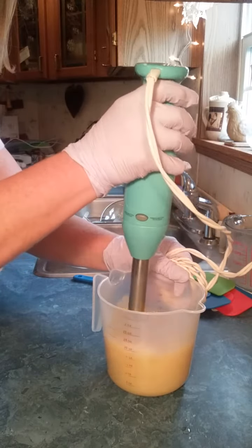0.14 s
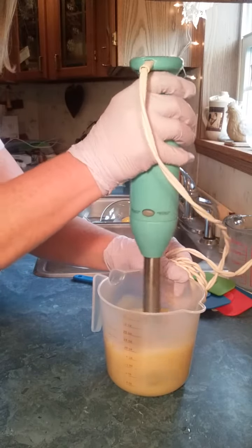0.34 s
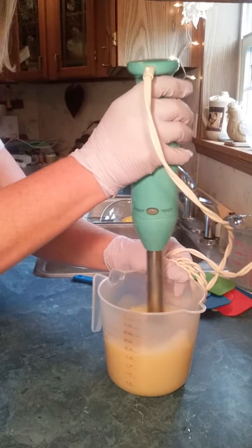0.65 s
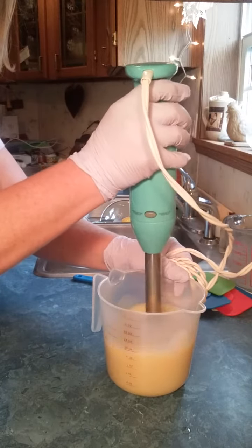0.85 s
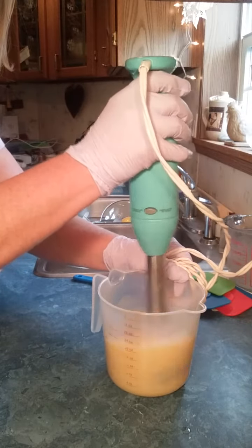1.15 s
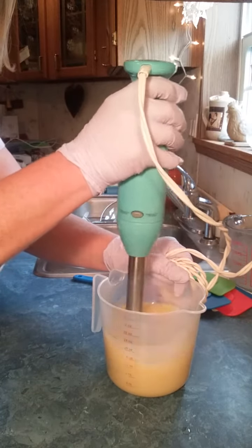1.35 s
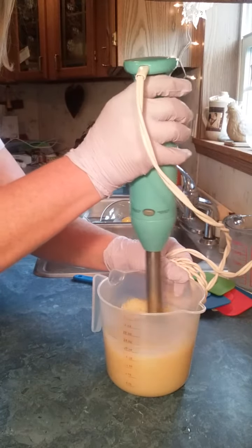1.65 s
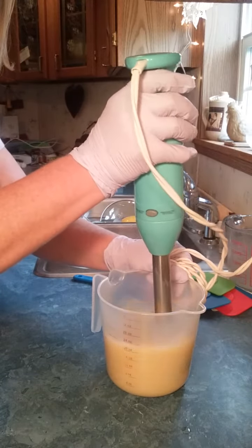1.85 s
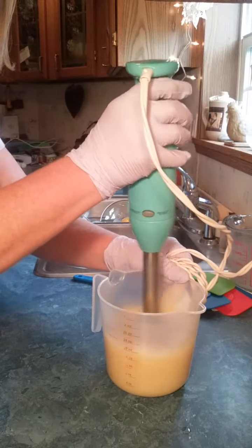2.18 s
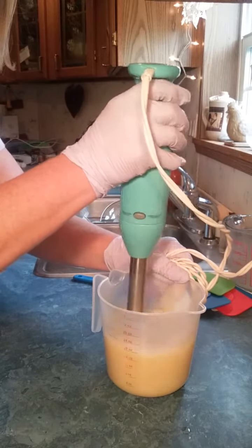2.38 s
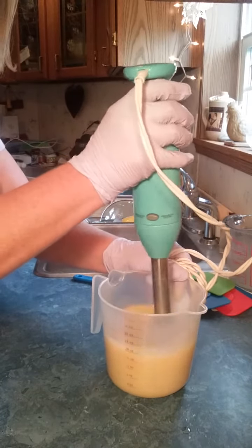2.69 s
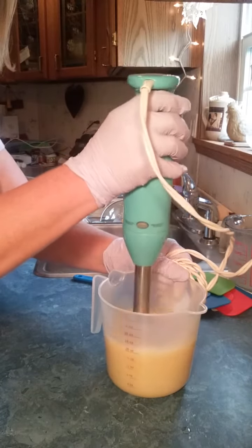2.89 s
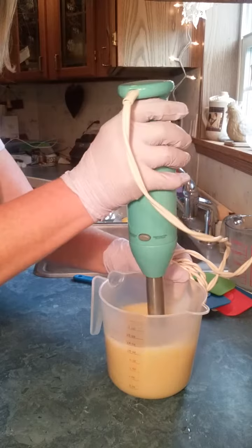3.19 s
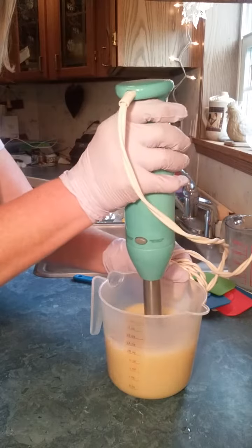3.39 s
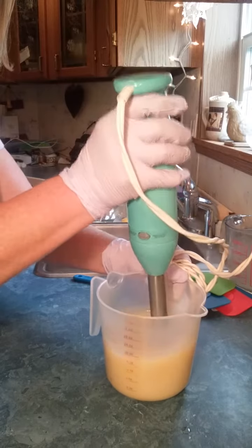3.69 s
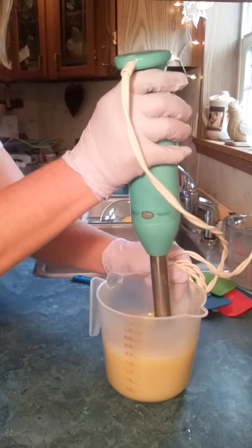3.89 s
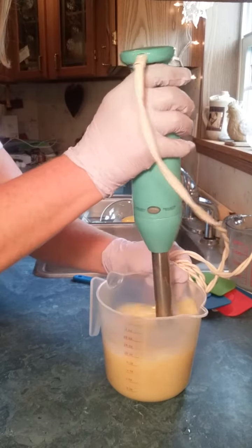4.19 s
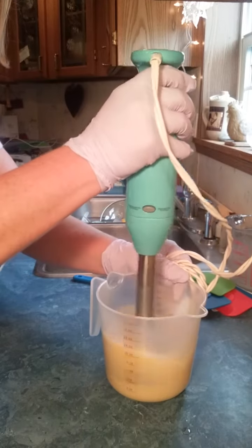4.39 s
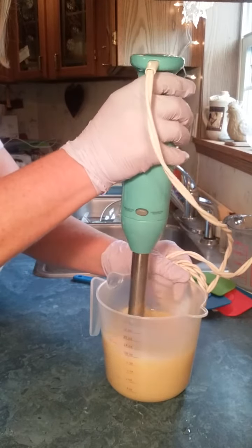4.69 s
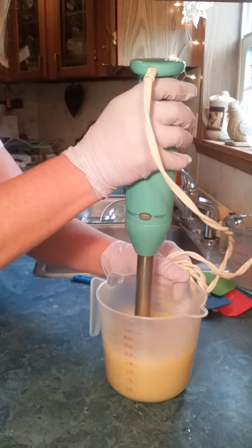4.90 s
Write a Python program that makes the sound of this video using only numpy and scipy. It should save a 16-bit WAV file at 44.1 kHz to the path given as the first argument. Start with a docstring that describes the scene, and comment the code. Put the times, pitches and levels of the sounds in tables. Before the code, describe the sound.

A stick blender, already running, is pulsed in thick batter in a plastic jug. Ten short presses follow: each motor run rises fast with hum, rattle and wet churning, then coasts down in pitch. Air pockets plop between them, the metal bell clacks on the jug, and a heavy dull bump lands just after 3.2 seconds. Close phone microphone, small kitchen, short echo.

```python
"""A kitchen counter, heard close by on a phone microphone, with a short echo from counter and cupboards.
A stick blender in a plastic jug of thick batter is already running; ten presses follow one another to the end.
In each the motor spins up, the shaft hums, coupling and bearing rattle, brushes hiss and the blade churns; then
it coasts. Around the presses air pockets plop, the bell clacks on the jug wall, and bumps ring jug and counter,
hardest just after 3.2 s. Noise shaped into resonances, ticks tied to the shaft and decaying sines make it all."""
import sys
import numpy as np
from scipy import signal
from scipy.fft import rfft, irfft
from scipy.io import wavfile
from scipy.ndimage import uniform_filter1d

SR = 44100
rng = np.random.default_rng(int(sys.argv[2]) if len(sys.argv) > 2 else 0)


def generate_wav(signal):
    """Clip the signal to [-1, 1] and save it as 16-bit WAV at the path in sys.argv[1]."""
    frames = np.transpose(np.atleast_2d(signal))
    scaled = np.clip(frames, -1, 1) * 32767
    pcm = np.round(scaled).astype(np.int16)
    wavfile.write(sys.argv[1], SR, pcm)


N = 222294
TIME = np.arange(N) / SR


def undb(db):
    """Decibels to gain."""
    return 10 ** (np.asarray(db) / 20)


def unit(x):
    """Scale to rms 1."""
    return x / np.sqrt(np.mean(x ** 2))


def shape_db(points, hz):
    """Read a spectrum on a log-frequency axis."""
    f, db = np.transpose(points)
    return np.interp(np.log(np.maximum(hz, 1)), np.log(f), db)


def colour(x, points, size=4096):
    """Causal filter with the given spectrum: minimum phase, by folding the cepstrum."""
    cepstrum = irfft(np.log(undb(shape_db(points, np.fft.rfftfreq(size, 1 / SR)))))
    cepstrum[1:size // 2] *= 2
    cepstrum[size // 2 + 1:] = 0
    response = irfft(np.exp(rfft(cepstrum)))
    return signal.fftconvolve(x, response)[:len(x)]


def walk(rate):
    """Smooth random wander, rms 1, with a new target `rate` times a second."""
    k = int(SR / rate)
    steps = np.repeat(rng.standard_normal(N // k + 1), k)
    return unit(uniform_filter1d(steps, k)[:N])


def fade(t, t60):
    """Exponential decay, 60 dB down after t60."""
    return np.exp(-np.log(1000) * t / t60)


def add(out, s, sound, db):
    """Mix a sound in at time s with the given peak level."""
    i = int(s * SR)
    out[i:i + len(sound)] += (undb(db) * sound / np.abs(sound).max())[:N - i]


# colour of the quiet kitchen: f/Hz, relative level/dB
KITCHEN_COLOUR = [(25, -12), (45, 0), (80, 0), (150, 4), (300, -7), (500, -10), (1000, -6), (2000, -14),
                  (5000, -19), (15000, -20)]


def kitchen(level_db=-69):
    """The quiet kitchen around the counter: steady coloured noise at a set rms level."""
    return undb(level_db) * unit(colour(rng.standard_normal(N), KITCHEN_COLOUR))


def room(x, wet_db=-9, t60=0.15, first_s=0.0031):
    """Counter and cupboards return a short, dense echo: a decaying noise tail behind the direct sound."""
    t = TIME[:SR // 2]
    tail = rng.standard_normal(len(t)) * fade(t, t60) * (t > first_s)
    return x + undb(wet_db) * signal.fftconvolve(x, tail / np.linalg.norm(tail))[:N]


# the bell bumps the jug against the counter: t/s, peak level/dB, pitch as a share of the modes' f
JUG_BUMPS = [(0.292, -32, 0.84), (.718, -45, 1.05), (1.249, -32.5, 0.94), (1.306, -28, 0.93),
             (1.82, -39, 0.98), (2.775, -36.5, 0.96), (2.838, -38.5, 1.04), (3.09, -23.5, 1.21),
             (3.216, -11.5, 1.05), (3.66, -18, 1.06), (3.765, -28.5, 0.968), (3.822, -37, 1.25),
             (4.383, -35.5, 1.08), (4.41, -40, 0.99), (4.851, -33, 1.01), (4.939, -47, 1)]
# what jug and counter ring with: f/Hz, relative level/dB, t60/s
JUG_RINGING = [(61, -16, 0.15), (118.5, -12.5, 0.21), (144.9, 6.5, 0.11), (175, -13.5, 0.1),
               (228, -6.5, 0.066)]


def bumps(contact_s=0.003):
    """Soft, cushioned blows set the modes of jug and counter ringing."""
    out, t = np.zeros(N), TIME[:SR // 3]
    cushion = 1 - np.exp(-(t / contact_s) ** 2)
    for s, peak_db, pitch in JUG_BUMPS:
        ring = sum(undb(db) * fade(t, t60) * np.sin(2 * np.pi * pitch * hz * t) for hz, db, t60 in JUG_RINGING)
        add(out, s, ring * cushion, peak_db)
    return out


# air pockets pop in the batter: t/s, peak level before the room/dB, starting f/Hz, smack level against ring/dB
AIR_POCKETS = [(.229, -30, 820, -18), (.254, -31.5, 2670, -5), (.285, -34, 1910, -1),
               (.357, -42, 1020, -19), (1.034, -24.5, 2548, -2), (1.118, -25, 1450, -9.5),
               (1.169, -45, 1440, -4), (1.202, -33.5, 897, -5), (1.22, -38, 1300, -22),
               (1.228, -30, 2200, -11), (1.248, -33.5, 1264, -4), (1.299, -35.5, 890, 4),
               (1.358, -40, 735, -9), (1.689, -25.5, 1049, -4), (2.198, -27, 875, -1),
               (2.298, -39, 906.4, 0), (2.772, -39.5, 1070, 0), (2.835, -41.5, 710, -2),
               (2.894, -32, 990, 1), (4.395, -34, 913, -3), (4.467, -42, 1180, 9), (4.77, -24, 2640, -16)]


def plops(ring_t60=0.058, smack_t60=0.12, glide=2.9, onset_s=0.00044):
    """Each air pocket rings, rising in pitch by `glide` of its start per second, inside a short wet smack."""
    out, t = np.zeros(N), TIME[:SR // 6]
    smack_colour = [(300, -18.5), (750, 0.5), (1200, -1.0), (2200, -9.0),
                    (3200, -13.5), (5500, -20.5), (7000, -29.5), (14000, -30)]  # f/Hz, level/dB
    for s, peak_db, hz, smack_db in AIR_POCKETS:
        ring = fade(t, ring_t60) * np.sin(2 * np.pi * hz * (t + glide * t ** 2 / 2))
        smack = unit(colour(rng.standard_normal(len(t)), smack_colour)) * fade(t, smack_t60)
        onset = 1 - np.exp(-t / onset_s)
        add(out, s, (ring + undb(smack_db) * smack) * onset, peak_db)
    return out


# the steel bell clacks on the jug wall: t/s, peak level before the room/dB
WALL_CLACKS = [(1.411, -29.5), (2.911, -31), (3.393, -31.5), (4.022, -33.5), (4.376, -30.5), (4.538, -22.5)]


def clacks(t60=0.12, housing_db=-3):
    """A short knock, a decaying burst of noise, rings both the bell and the housing."""
    out, t = np.zeros(N), TIME[:SR // 6]
    for s, peak_db in WALL_CLACKS:
        blow = rng.standard_normal((2, len(t))) * fade(t, t60)
        bell = colour(blow[0], BELL_COLOUR)
        housing = colour(blow[1], DRIVE_COLOUR)
        add(out, s, bell + undb(housing_db) * housing, peak_db)
    return out


def spin(on, off, coast_s, rise_s=.04, friction=.12):
    """Share of full speed: the rotor gains energy under power, then batter and bearings brake it to a stop."""
    powered = np.sqrt(1 - np.exp(-np.clip(TIME - on, 0, 1) / rise_s))
    coasting = (1 + friction) * np.exp(-np.clip(TIME - off, 0, 1) / coast_s) - friction
    return powered * np.maximum(coasting, 0)


def attack(on, attack_s=0.013):
    """Soft start: the coupling takes up its play and the blade catches the batter."""
    return 1 - np.exp(-np.maximum(TIME - on, 0) / attack_s)


# presses of the button, shared by every layer of the motor: on t/s, off t/s, full-speed shaft f/Hz,
#   coasting time constant/s, levels of drive rattle, bell chatter and churning/dB (scene() trims them),
#   vortex f at switch-on/Hz, at switch-off/Hz, deepest bite t/s, swell of the churning there/dB,
#   levels of shaft orders 1, 2, 3, 4, 5 at full speed/dB
BUTTON_PRESSES = [ (-.15, .091, 172.5, 0.28, -31, -30, -31.5, 1000, 1070, .02, 5, -36, -43, -44, -34, -50),
                  (0.353, 0.569, 175.9, .2, -30, -29.5, -30, 960, 1050, .46, 2.5, -33, -45.5, -42.5, -32.5, -49),
                  (0.807, 0.963, 177.1, 0.25, -31.5, -29, -35, 990, 845, .93, 4, -29.5, -46, -47, -28, -33),
                  (1.402, 1.616, 176.2, 0.24, -30.5, -30, -32.5, 960, 938.2, 1.48, 9, -35, -45.5, -42, -28, -38.5),
                  (1.915, 2.099, 175.8, 0.22, -30, -31, -37.5, 1000, 1060, 2.01, 8.5, -30, -47, -50, -34, -64),
                  (2.334, 2.556, 173, 0.22, -29.5, -30.5, -31.5, 1020, 1091, 2.47, 0.5, -37, -45, -52.5, -38.5, -41),
                  (2.902, 3.119, 173.2, .225, -28.5, -26.5, -31, 900, 1440, 3.065, 8.5, -32.5, -39, -45, -46, -48.5),
                  (3.384, 3.64, 173.1, .245, -30, -26.5, -32.5, 1070, 1111, 3.63, 0.5, -31.5, -36.5, -44.5, -46, -50),
                  (4.012, 4.155, 175.8, .22, -31, -30.5, -38.5, 880, 1138, 4.125, 4, -36, -52, -53, -34.5, -48),
                  (4.523, 4.751, 172.5, 0.22, -29.5, -31, -34, 1240, 1090, 4.7, 3.5, -36.5, -51.5, -51, -38, -39.5)]


def shaft_speed():
    """Turns per second of the shaft; the fastest press wins, and 1 Hz keeps the turn count rising."""
    runs = [hz * spin(on, off, coast_s) for on, off, hz, coast_s, *_ in BUTTON_PRESSES]
    return np.max(runs, axis=0) + 1


# loudness follows a power of the shaft speed: exponent under power, exponent while coasting
RATTLE_POWERS = (1.73, 3.0)
CHATTER_POWERS = (0.99, 3.3)
CHURN_POWERS = (.5, 2.54)


def loudness(on, off, coast_s, powers, still_share=.11, lag_s=0.007):
    """Envelope of one press: swells with the speed, outlasts the current by lag_s, is nil below still_share."""
    share = np.maximum((spin(on, off + lag_s, coast_s) - still_share) / (1 - still_share), 0)
    return attack(on) * share ** np.where(TIME < off, powers[0], powers[1])


def load(bite_s=0.043):
    """Gains of rattle, chatter and churning; the churning swells over about bite_s each side of the bite."""
    rattling, chattering, churning = np.zeros((3, N))
    for on, off, _, coast_s, rattle_db, chatter_db, churn_db, _, _, bite_at, bite_db, *_ in BUTTON_PRESSES:
        bite = np.exp(-((TIME - bite_at) / bite_s) ** 2 / 2)
        rattling += undb(rattle_db) * loudness(on, off, coast_s, RATTLE_POWERS)
        chattering += undb(chatter_db) * loudness(on, off, coast_s, CHATTER_POWERS)
        churning += undb(churn_db + bite_db * bite) * loudness(on, off, coast_s, CHURN_POWERS)
    return rattling, chattering, churning


def swirl(speed, db=-42, waver_db=3.3, power=1.69):
    """The swirling batter buffets the jug with a low, lumpy rumble that grows with the speed."""
    shaking = colour(rng.standard_normal(N), COUNTER_COLOUR)
    rumble = signal.sosfilt(signal.butter(4, 280, fs=SR, output="sos"), shaking)
    return undb(db + waver_db * walk(25)) * unit(rumble) * (speed / speed.max()) ** power


# whine of the commutator: shaft order, level at top speed/dB (wavering)
COMMUTATOR_WHINE = [(24, -45), (48, -55), (70, -60), (84, -63)]


def brushes(turns, speed, hiss_db=-53.0, hiss_power=1.45, whine_power=6):
    """Carbon brushes hiss on the commutator and its segments whine, both following the shaft speed."""
    hiss_colour = [(2500, -18), (6000, -4.0), (8300, -3), (8900, -4.5),
                   (10200, -2.5), (11700, -6.5), (12400, -5), (15500, -11.5)]  # f/Hz, level/dB
    hiss = unit(colour(rng.standard_normal(N), hiss_colour))
    sway = .002 * walk(120)  # turns
    whine = sum(undb(db + 2 * walk(30)) * np.sin(2 * np.pi * k * (turns + sway)) for k, db in COMMUTATOR_WHINE)
    share = speed / speed.max()
    return undb(hiss_db) * hiss * share ** hiss_power + whine * share ** whine_power


def rattle(turns, pattern_db, scatter_db, slip, hiss_db, count=24):
    """Ticks at fixed angles of the shaft, partly alike on every turn, with rubbing noise that swells once a turn."""
    angles, pattern = rng.random(count), rng.standard_normal(count)
    chance = rng.standard_normal((int(turns[-1]), count, 2))
    at = np.arange(len(chance))[:, None] + angles + slip * chance[..., 0]
    size_db = pattern_db * np.cos(2 * np.pi * angles) + scatter_db * np.minimum(chance[..., 1], 2)
    sizes = np.sign(pattern) * undb(size_db)
    ticks = np.bincount(np.searchsorted(turns, at.ravel()), sizes.ravel(), N + 1)[:N]
    # slow turns tick less often, so each tick carries more of the sound
    ticks = unit(ticks / np.sqrt(np.gradient(turns) * SR + 10))
    rub = unit(rng.standard_normal(N) * undb(pattern_db * np.cos(2 * np.pi * turns)))
    return ticks + undb(hiss_db) * rub


def vortex_pitch():
    """The hollow around the blade changes pitch steadily during a press, then drifts on to the next one."""
    presses = np.array(BUTTON_PRESSES)
    return np.interp(TIME, presses[:, :2].ravel(), presses[:, 7:9].ravel())


# resonances of the batter's hollow and the jug above it: f/Hz, width/Hz
VORTEX_MODES = [(680, 325), (860, 570), (1040, 256), (1250, 92), (1520, 480)]
# colour of the churned batter: f/Hz, relative level/dB
BATTER_COLOUR = [(300, -39), (400, -22.5), (460, 3.5), (570, -10), (640, -2), (780, -0.5), (860, -1.5),
                 (920, -1.5), (1040, 4.5), (1150, -1), (1250, 2.5), (1420, -4), (1600, -0.5), (2100, -49)]


def churn(turns, flutter_db=1.5, spread_octaves=0.38, wander=0.1):
    """The blade tears the batter; the vortex stresses whichever resonances lie near its own shifting pitch."""
    vortex_hz = vortex_pitch() * np.exp(wander * walk(50))
    octaves_off = [np.log2(hz / vortex_hz) for hz, _ in VORTEX_MODES]
    weights = np.exp(-(np.array(octaves_off) / spread_octaves) ** 2 / 2)
    weights /= np.linalg.norm(weights, axis=0)
    out = np.zeros(N)
    for weight, (hz, width) in zip(weights, VORTEX_MODES):
        tearing = rattle(turns, pattern_db=-0.5, scatter_db=7.0, slip=.06, hiss_db=-11.5)
        out += weight * signal.lfilter(*signal.iirpeak(hz, hz / width, fs=SR), tearing)
    return unit(colour(out, BATTER_COLOUR)) * undb(flutter_db * walk(80))


# colour of the steel bell around the blade: f/Hz, relative level/dB
BELL_COLOUR = [(900, -16), (1400, -8.5), (1560, -3.5), (1780, 0.5), (1900, 1.5), (2020, 3), (2130, 2.5),
               (2250, 3.5), (2400, -6.5), (2900, -13.5), (4500, -46)]


def chatter(turns, flutter_db=2.0):
    """The shaft knocks in its lower bearing and rings the steel bell."""
    knocks = rattle(turns, pattern_db=2.5, scatter_db=1.5, slip=0.027, hiss_db=-10.5)
    return unit(colour(knocks * undb(flutter_db * walk(130)), BELL_COLOUR))


# colour of the drive in its housing: f/Hz, relative level/dB
DRIVE_COLOUR = [(1200, -16.5), (2400, -5), (2700, -4), (2900, -4), (3300, -3), (4300, -0.5), (4850, -4.5),
                (5300, -4.5), (6300, -12.5), (7500, -21), (8900, -26.5), (12800, -37), (16000, -31)]


def drive(turns, flutter_db=1.0):
    """The shaft coupling rasps in the housing with every turn."""
    ticks = rattle(turns, pattern_db=2.5, scatter_db=5.0, slip=.04, hiss_db=2.0)
    return unit(colour(ticks, DRIVE_COLOUR)) * undb(flutter_db * walk(90))


# how jug and counter pass on the shaft's shaking: f/Hz, relative level/dB
COUNTER_COLOUR = [(40, -46), (70, -8), (105, -4), (145, 8.5), (175, 3.5), (200, -3.5), (238, 5),
                  (290, -4.5), (345, -6.5), (410, -14.5), (520, -11.5), (570, -8), (700, -2.5), (900, -6)]


def hum(waver_db=2.0, coast_waver_db=4, jitter=0.011, shake_power=2.53, buzz_power=5.16, buzz_t60=0.36,
        surge_db=22, jerk_turns=0.0043):
    """Unbalance (orders 1, 2) sweeps the counter's resonances; motor buzz (3-5) dies away after switch-off."""
    out = np.zeros(N)
    wobble = 1 + jitter * walk(90)
    # clinging lumps jerk the shaft back and forth within a turn
    jerk = jerk_turns * walk(200)
    wavers = [walk(55) for _ in range(5)]
    for on, off, full_hz, coast_s, *columns in BUTTON_PRESSES:
        order_levels = columns[-5:]
        share = spin(on, off, coast_s)
        live = share > .1
        share, start, t = share[live], attack(on)[live], TIME[live]
        turns = np.cumsum(full_hz * share * wobble[live]) / SR + jerk[live] / share
        shake = share ** shake_power
        buzz = share ** buzz_power * fade(np.maximum(t - off, 0), buzz_t60)
        # a slow rotor draws a surge of current, which shakes the motor harder in orders 2-5
        start_db = surge_db * np.minimum(1 - share, .35) * (t < off)
        for k, db in enumerate(order_levels, 1):
            resonance_db = shape_db(COUNTER_COLOUR, k * full_hz * share) - shape_db(COUNTER_COLOUR, k * full_hz)
            # lumps of batter disturb a slow blade more than a fast one
            lumps_db = (waver_db + coast_waver_db * (1 - share)) * wavers[k - 1][live]
            gain = undb(db + resonance_db + lumps_db + start_db * (k > 1))
            force = (shake if k <= 2 else buzz) * gain
            tone = np.sin(2 * np.pi * (k * turns + rng.random()))
            out[live] += np.sqrt(2) * start * force * tone
    return out


def scene(drive_db=0.0, chatter_db=-1.17, churn_db=-1.5):
    """One shaft speed drives the blender's noise; hum, swirl and bumps reach the microphone without the echo."""
    speed = shaft_speed()
    turns = np.cumsum(speed) / SR
    drive_gain, chatter_gain, churn_gain = load()
    blender = brushes(turns, speed)
    blender += undb(churn_db) * churn_gain * churn(turns)
    blender += undb(chatter_db) * chatter_gain * chatter(turns)
    blender += undb(drive_db) * drive_gain * drive(turns)
    echoed = room(blender + plops() + clacks())
    return (kitchen() + bumps() + swirl(speed) + echoed + hum())[None]


def record(dry, low_cut_hz=42, top_hz=15550):
    """The phone microphone cuts the deep bass and the top of the treble."""
    lean = signal.sosfilt(signal.butter(4, low_cut_hz, "high", fs=SR, output="sos"), dry)
    return signal.sosfilt(signal.ellip(10, .2, 70, top_hz, fs=SR, output="sos"), lean)


dry = scene()
out = record(dry)
generate_wav(out)
```